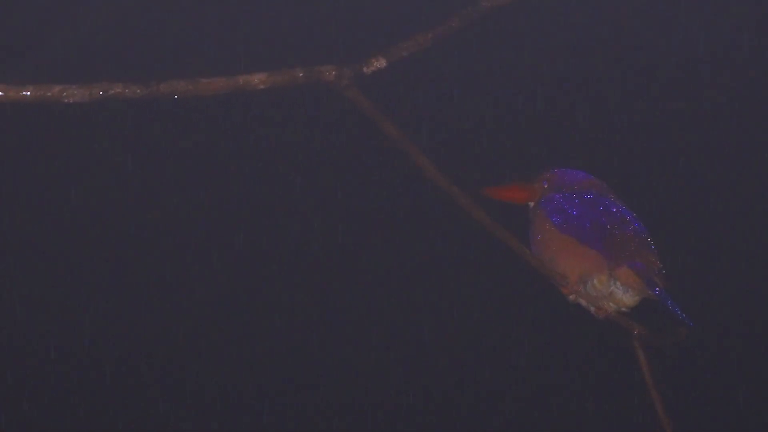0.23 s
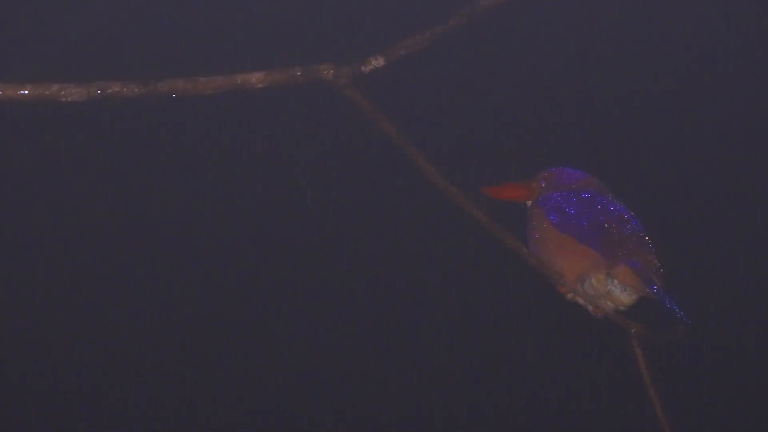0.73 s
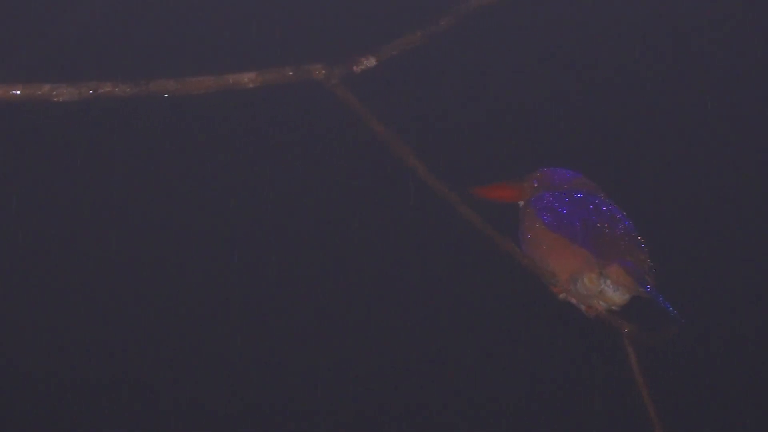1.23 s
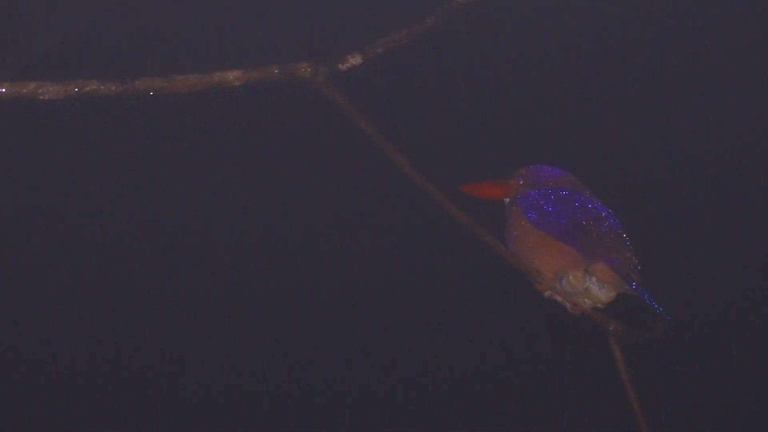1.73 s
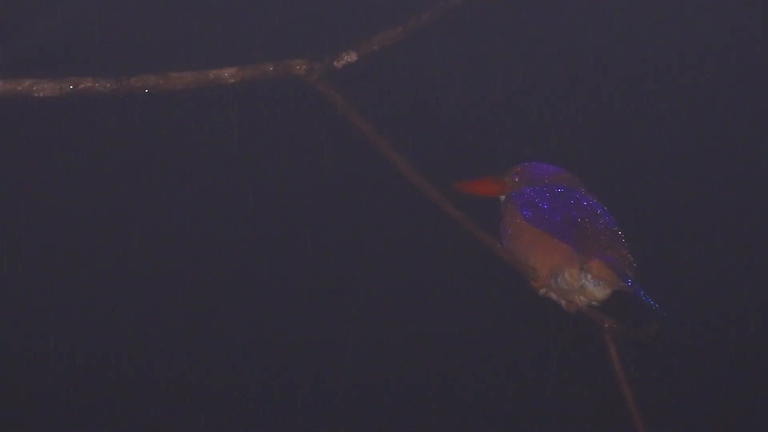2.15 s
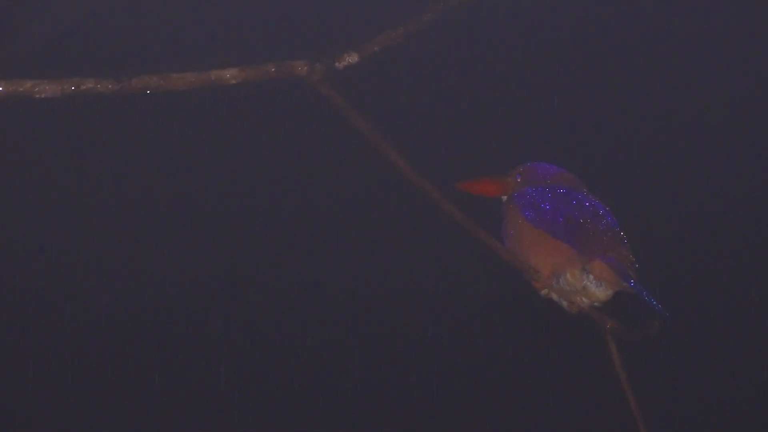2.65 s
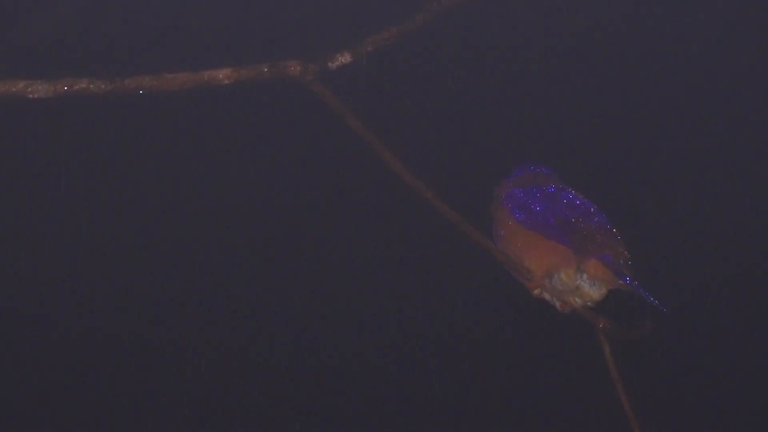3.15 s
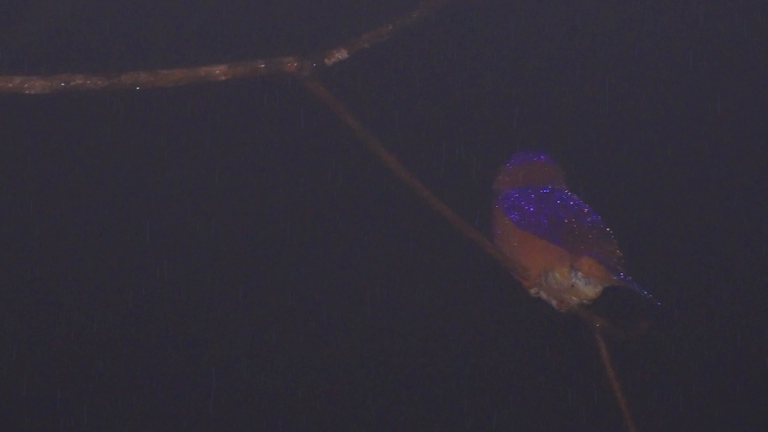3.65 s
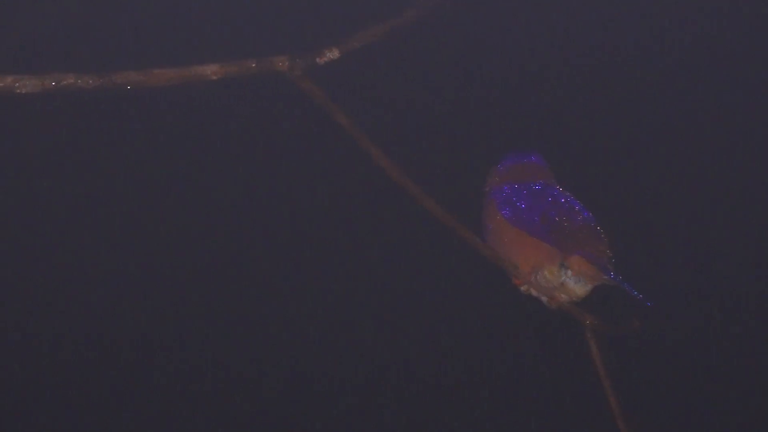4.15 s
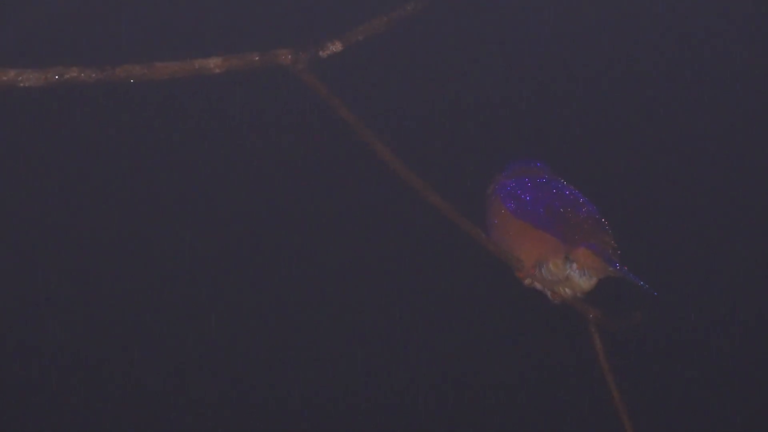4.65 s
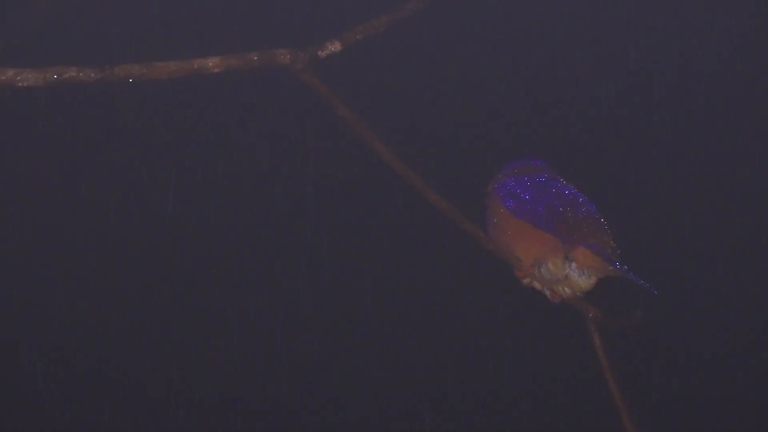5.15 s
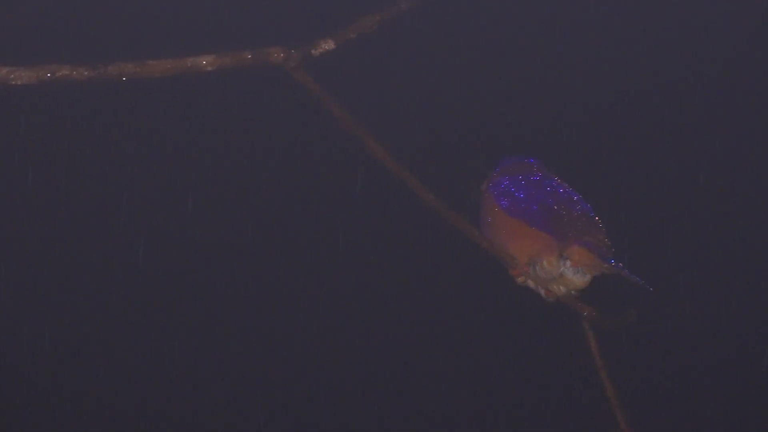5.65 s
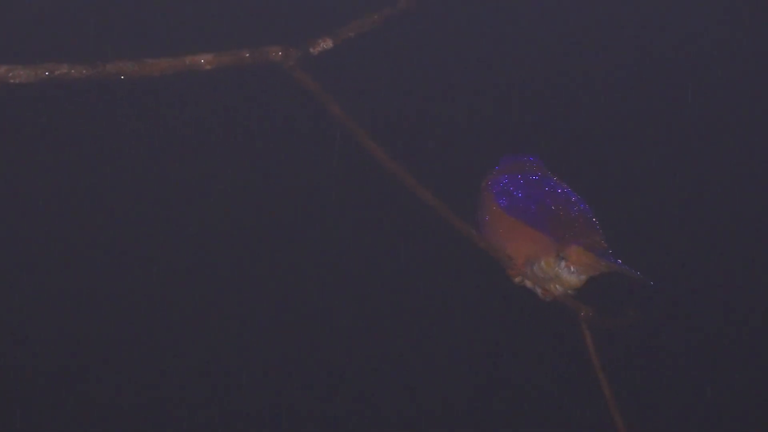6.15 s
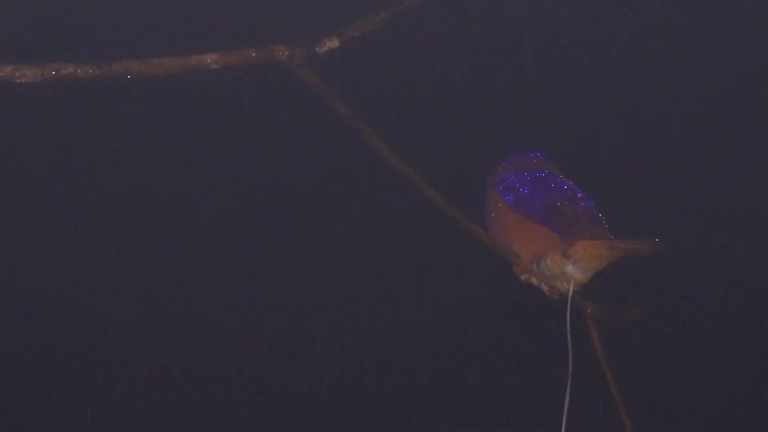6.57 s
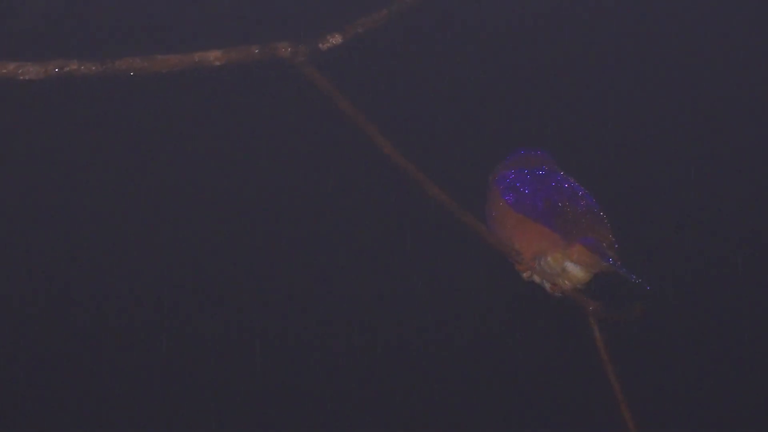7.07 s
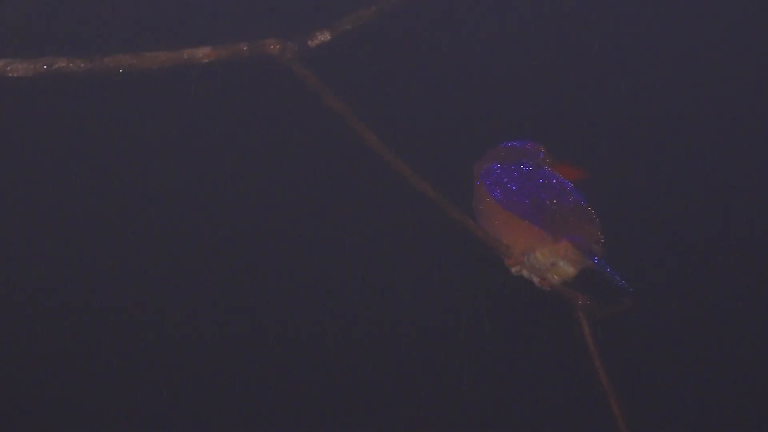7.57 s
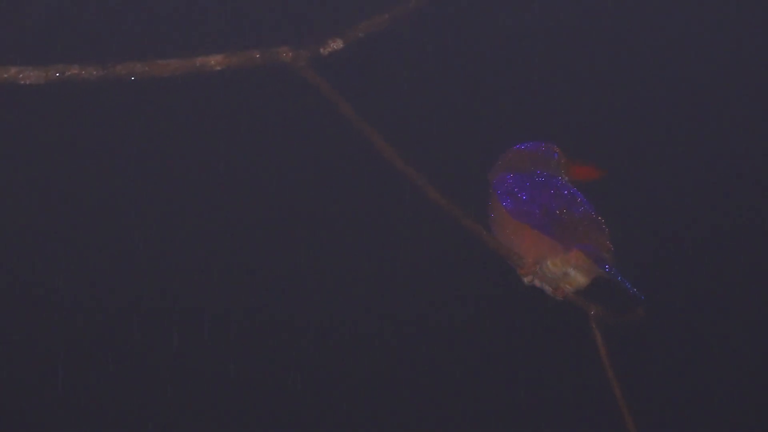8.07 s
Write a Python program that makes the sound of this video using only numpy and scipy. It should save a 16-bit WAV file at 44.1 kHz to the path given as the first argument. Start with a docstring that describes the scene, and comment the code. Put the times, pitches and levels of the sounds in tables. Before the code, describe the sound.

Steady rain hisses on a forest canopy at night, over a continuous high drone of crickets. Two katydids close on the right give short, high buzzing chirps, often about three quarters of a second apart, and fainter ones answer from farther off. Thin rasps come from both sides and large drops tap on leaves. Soft cricket peeps run through the first three seconds and return briefly near the end.

```python
"""A wet forest at night. Rain hisses throughout under crickets, a faint frog and the high rasps of small
katydids. From 0.7 s two katydids close on the right share short buzzing wing strokes, mostly three
quarters of a second apart, answered by far ones. Cricket peeps run until 3 s while large drops knock
on leaves; the drops then thin out, and the peeps return briefly at 7.6 s."""
import sys
import numpy as np
from scipy import signal
from scipy.fft import rfft, irfft, next_fast_len
from scipy.io import wavfile
from scipy.ndimage import uniform_filter1d

SR = 44100
rng = np.random.default_rng(int(sys.argv[2]) if len(sys.argv) > 2 else 0)


def transcribe(u):
    """Save the signal u as a 16-bit wav file named by the first command-line argument.

    u: samples, shape (n,) or (channels, n), limited to [-1, 1]; the rate is SR.
    q: integer samples, one column per channel.
    """
    v = np.clip(np.atleast_2d(u).T, -1, 1)
    q = np.round(v * 32767).astype(np.int16)
    wavfile.write(sys.argv[1], SR, q)


N = 366010

# Katydids (pan is always left minus right): pan/dB, tooth rate/Hz, 10.5 kHz lift/dB, [(t/s, level/dB)]
KATYDIDS = [(-9.5, 340.8, 0, [(.74, -31), (1.472, -30), (5.063, -30), (6.581, -30), (7.31, -31),
            (8.258, -30.5)]), (-17, 342.2, -0.5, [(2.246, -30.5), (3.744, -31), (4.408, -30),
            (5.852, -30.5)]), (-16, 339, 0, [(.02, -45.5), (.416, -52), (2.724, -54), (7.765, -57)]),
            (-5, 336.5, -2, [(1.071, -52.5), (1.274, -53.5), (1.953, -53), (2.615, -57), (3.483, -52),
            (4.09, -51), (5.504, -55), (6.237, -56), (6.917, -56)]), (-13, 240, 5, [(3.062, -49),
            (8.084, -49)])]
# Tone colour of the wing: f/Hz, level/dB
WING_SPECTRUM = [(4120, -61), (7000, -20.5), (7420, -31), (7780, -15), (8410, -9), (9260, -6), (9510, -2),
                 (9980, -1.5), (11000, -13.5), (11400, -19), (11900, -17.5), (12900, -24), (14600, -21),
                 (15800, -24)]
# When each band of the wing peaks within a stroke: f/Hz, offset/s
WING_TIMING = [(7800, -0.02), (8500, -0.016), (9500, -0.011), (10300, -0.011), (12000, -0.031),
               (15000, -0.031)]
# Rasps of smaller katydids: t/s, level/dB, pan/dB, half length/s
RASPS = [(0.242, -41, 7, 0.013), (0.636, -47, 6, 0.036), (0.818, -38.5, 14, 0.075),
         (0.932, -43.5, 1.5, 0.035), (1.184, -46, 0.8, 0.068), (1.513, -33, 5, 0.051),
         (2.585, -40.5, -4, 0.026), (2.678, -47, -3.5, 0.059), (3.05, -42, 12, 0.023),
         (3.165, -39, 16, 0.025), (3.23, -42, 6, 0.042), (3.342, -36, -9, 0.035), (3.548, -36, 11, 0.03),
         (4.011, -39, -10, 0.043), (4.94, -35, 11, 0.025), (5.132, -39, 0, 0.073), (5.543, -37, 10, 0.023),
         (5.692, -44, 3.1, 0.073), (5.843, -42, 0, 0.041), (6.171, -36.5, -3.7, 0.038),
         (6.358, -45, -11, 0.032), (7.216, -40, 9, 0.026), (7.908, -38, -7, 0.037)]
# Wing modes of a rasp: f/Hz, width/Hz, level/dB
RASP_MODES = [(11700, 900, -8), (13000, 1300, 0), (14000, 1400, 2), (14900, 1400, 4), (15700, 1200, 6)]
# Large drops on leaves, the highest sharp spatters: t/s, level/dB, f/Hz, pan/dB, ring/s
DROPS = [(.2418, -28, 10400, 8, .008), (.4815, -31, 1380, 8, .03), (.4817, -39, 2500, 6, .008),
         (1.0435, -29, 10400, -10, .008), (1.539, -35.5, 2450, -3, .012), (2.5575, -32.5, 10400, -8, .008),
         (2.6045, -39, 3100, 5, .006), (2.6835, -39, 850, 0, .014), (2.5172, -41, 1500, 2, .012),
         (2.587, -42, 1450, 0, .012), (2.6045, -49, 520, 0, .008), (.3082, -42, 1730, 2, .01),
         (1.2441, -41, 1360, 0, .01), (1.3448, -42, 1720, 4, .01), (1.4701, -42, 1090, 2, .01),
         (6.0856, -42, 2000, -5, .01), (7.2584, -41, 2000, -2, .008), (8.0336, -43, 1050, 3, .01),
         (2.7261, -31, 1950, -10, .006), (2.7262, -30.5, 10400, -8, .008), (3.4425, -33, 3100, 3, .006),
         (3.4512, -35, 1250, -10, .01), (3.4665, -32, 10400, -9, .008), (3.9255, -32, 10400, -2, .008),
         (4.6983, -34.5, 5000, -2, .006), (4.8775, -36, 3400, 0, .008), (5.078, -31, 10400, 0, .006),
         (6.165, -57, 330, 0, .015), (5.122, -52.5, 330, -1, .02), (5.362, -58, 280, 1, .02),
         (6.82, -58, 280, 0, .015), (7.31, -60, 300, 0, .015), (6.9122, -41, 1150, -9, .012),
         (7.2718, -32, 1900, 4, .01), (7.8237, -35, 5000, -2, .006)]
# Bouts of cricket peeps: first t/s, last t/s, level/dB
PEEP_BOUTS = [(.737, 2.953, -47.3), (7.57, 8.028, -47.8)]
# Single short cricket notes: t/s, f/Hz, level/dB
LONE_NOTES = [(.36, 5930, -51), (1.752, 6250, -53), (2.558, 5820, -50)]
# Cricket trills, long then short: t/s, level/dB, length/s
TRILLS = [(.2, -51, 0.3), (.5, -53.5, 0.18), (1.385, -53, 0.29), (1.681, -53.5, 0.19), (2.453, -53, .24),
          (2.71, -55, 0.2), (3.44, -54, .28), (3.756, -61, 0.18), (4.569, -52, 0.27), (4.86, -57, 0.17),
          (5.68, -54, 0.32), (5.98, -56, 0.18), (7.039, -53.5, 0.24), (7.317, -52.5, 0.17),
          (8.171, -51, 0.27)]
# Tone colour of the rain wash: f/Hz, level/dB
RAIN_SPECTRUM = [(20, -50), (45, -53), (120, -11.5), (300, -13.5), (430, -13), (680, -0.5), (1070, 0),
                 (1720, 1), (2600, 0), (3800, -6), (5200, 2), (7000, 2.5), (8000, -2), (11500, -3.5),
                 (16000, -6.5)]
# Narrow dips in the wash: f/Hz, half width/Hz, level/dB
RAIN_DIPS = [(828, 25, -6), (1004, 21, -2.5), (1260, 35, -2.5), (1543, 45, -3.5), (2700, 92, -0.5)]
# How alike the wash is left and right: f/Hz, correlation
RAIN_LIKENESS = [(60, 0.6), (130, 0.99), (290, 0.12), (640, 0.73), (1410, 0.068), (3100, 0.56), (6800, 0.5),
                 (15000, 0.32)]
# Where the wash leans: f/Hz, pan/dB
RAIN_PAN = [(60, -2), (150, -2.5), (380, -4.5), (950, 4.5), (2380, -1.5), (5980, -0.5), (15000, -1)]
# Low hum under the rain: f/Hz, level/dB
HUM_TONES = [(48.4, -95), (70.0, -87.5), (118.4, -86)]
# Faint held tones in the wash: f/Hz, width/Hz, level/dB
MURMUR_TONES = [(328.5, 26, -84.5), (686, 20, -72.5), (757, 23, -72.5), (1060, 26, -71.5),
                (1182, 23, -74.5), (1932, 28, -71.5)]
# Echoes off trunks: t/s, level/dB
TRUNK_ECHOES = [(0.011, -9), (.045, -8.5), (.085, -12.5), (.13, -25)]
# Decay of the tail from the leaves: f/Hz, t60/s
FOREST_DECAY = [(300, 0.39), (2000, 0.12), (9000, 0.59), (15000, 0.22)]
# Phase lag of the microphone's right port: f/Hz, lag/rad
RIGHT_LAG = [(700, 0.61), (1700, 0.27), (2400, 3.54), (4500, 2.8), (7200, 2.83), (9000, 1.75),
             (12000, 3.98)]

NEAR_DB = -38  # strokes louder than this sit close by


def stroke(tooth_hz, lift_db, roughness):
    """One wing stroke: evenly struck teeth give a comb of partials. It creeps, bites and stops short."""
    t = np.arange(-.1, .1, 1 / SR)
    harmonic = np.arange(20, 47)[:, None]
    hz = harmonic * tooth_hz
    glide = -.085 * np.pi * (harmonic - 28) ** 2  # each tooth's ring slides in pitch
    jitter = 2 * np.pi * hz * 10e-6 * drift(60, len(t))  # the teeth fall a little unevenly
    scatter = .35 * rng.standard_normal(hz.shape)
    wander = roughness * (hz / 9500) ** 2 * np.array([drift(60, len(t)) for _ in hz])
    flutter_db = 2.4 * np.array([drift(25, len(t)) for _ in hz])
    creep_db = -7 * np.clip((hz - 8600) / 900, 0, 1) * (1 - np.tanh((t + .024) / .002)) / 2
    fall_s = np.clip(.013 + .011 * (hz - 8200) / 1000, .01, .04)
    swell = hump(t - curve(WING_TIMING, hz), .024, fall_s)
    stop = (1 - np.tanh((t - .015) / .002)) / 2
    colour_db = curve(WING_SPECTRUM, hz) + lift_db * hump(hz - 10500, 610, 550)
    partials = np.cos(2 * np.pi * hz * t + glide + jitter + scatter + wander)
    buzz = (gain(colour_db + flutter_db + creep_db) * swell * stop * partials).sum(0)
    return buzz / rms(buzz[abs(t) < .015])


def katydids(near, roughness):
    """The near or the far singers; the tooth rate wavers from stroke to stroke."""
    out = np.zeros((2, N))
    for pan_db, tooth_hz, lift_db, strokes in KATYDIDS:
        for s, db in strokes:
            if (db > NEAR_DB) == near:
                buzz = stroke(tooth_hz + .5 * rng.standard_normal(), lift_db, roughness)
                place(out, s - .1, gain(db) * buzz, pan_db)
    return out


def rasps(faint_per_s=1.2, clicks_per_s=4000):
    """Fast uneven tooth clicks ring a few high modes, whose level and timing differ in every rasp."""
    out, t = np.zeros((2, N)), np.arange(-.15, .15, 1 / SR)
    # Each near stroke ends in a high hiss.
    hisses = [(s + .082, db - 20, 4, .067)
              for *_, strokes in KATYDIDS for s, db in strokes if db > NEAR_DB]
    faint = [(when * N / SR, -60 + 6 * level, 18 * (side - .5), .025 + .03 * length)
             for when, level, side, length in rng.random((round(faint_per_s * N / SR), 4))]
    for s, db, pan_db, half_s in RASPS + hisses + faint:
        clicks = rng.standard_normal(len(t)) * (rng.random(len(t)) < clicks_per_s / SR)
        rasp = np.zeros(len(t))
        for hz, width, mode_db in RASP_MODES:
            spread, slip = rng.standard_normal(2)
            swell = hump(t - .3 * half_s * slip, .75 * half_s, .5 * half_s)
            rasp += gain(mode_db + 3.5 * spread) * resonate_twice(clicks, hz, width) * swell
        place(out, s - .15, .65 * gain(db) * rasp / rms(rasp[abs(t) < half_s]), pan_db)
    return out


def leaf_hit(hz, ring_s):
    """A drop pops, the leaf rattles above and below that pitch, and a long ring brings a low knock."""
    t = np.arange(0, .15, 1 / SR)
    cycles = t * hz
    pop = np.sin(2 * np.pi * cycles) * cycles * np.exp(-1.3 * cycles)
    burst = rng.standard_normal(len(t)) * gain(-30 * t / ring_s) * np.minimum(cycles, 1)
    rattle = .8 * resonate_twice(burst, 1.26 * hz, .22 * hz) + resonate_twice(burst, .88 * hz, .18 * hz)
    rattle *= np.clip(22 * ring_s, .12, 1) / abs(rattle).max()
    knock = np.sin(2 * np.pi * .41 * cycles) * gain(-60 * t / (2.9 * ring_s)) * np.minimum(t / .004, 1)
    return pop / abs(pop).max() + rattle + .5 * (ring_s / .032) ** 3 * knock


def drops(patter_per_s=250, patter_db=-55.5):
    """Large drops and spatters hit leaves over a patter of small ones to either side."""
    out = np.zeros((2, N))
    for s, db, hz, pan_db, ring_s in DROPS:
        place(out, s, gain(db) * leaf_hit(hz, ring_s), pan_db)
    leaves = [leaf_hit(hz, .01)[:2000] for hz in np.geomspace(1000, 5000, 16)]
    for when, which, size in rng.random((round(patter_per_s * N / SR), 3)):
        leaf = int(which * len(leaves))
        db = patter_db + 3.12 * min(-np.log(size), 3)
        place(out, when * N / SR, gain(db) * leaves[leaf], pan_db=8 * (-1) ** leaf)
    return out


def whistle(hz, db, envelope):
    """One cricket note, unsteady in pitch and level."""
    tone = sine(hz + 60 * drift(150, len(envelope)))
    return gain(db + 3.5 * drift(100, len(envelope))) * tone * envelope


def peeps(gap_s=.445):
    """Evenly paced peeps sag ever faster through 5.8 kHz, each trailed by a blip; a few blips are lone."""
    out, t = np.zeros((2, N)), np.arange(-.04, .04, 1 / SR)
    peep, blip = np.exp(-(t / .016) ** 4), hump(t, .0079, .0064)
    sag_hz = 5886 - 327 * np.maximum(t / .016 + 1, 0) ** 2 / 4
    for first, last, db in PEEP_BOUTS:
        for s in np.linspace(first, last, round((last - first) / gap_s) + 1):
            place(out, s - .04, whistle(sag_hz, db, peep))
            place(out, s - .04 + .027, whistle(5970, db - 7, blip))
    for s, hz, db in LONE_NOTES:
        place(out, s - .04, whistle(hz, db, blip))
    return out


def trill(length_s):
    """Puffs of tooth noise ring a distant cricket's wing near 4.5 kHz."""
    t = np.arange(-length_s, length_s, 1 / SR)
    puffs = 1 + .78 * np.cos(phase(75 + 15 * drift(14.2, len(t))))
    ring = resonate_twice(puffs * rng.standard_normal(len(t)), 4460, 420)
    return unit_rms(ring) * hump(t, .45 * length_s, .22 * length_s)


def crickets():
    """Trills over a distant, unbroken crowd of the same kind."""
    out = np.zeros((2, N))
    for s, db, length_s in TRILLS:
        place(out, s - length_s, gain(db) * trill(length_s), pan_db=2)
    crowd = np.array([resonate(noise, 4440, 210) for noise in rng.standard_normal((2, N))])
    return out + gain(-67.5 + 2.5 * drift(4.1)) * unit_rms(crowd)


def cricket_buzz():
    """One steady, fast-pulsed cricket near 7.2 kHz, centred in a wide crowd."""
    pulses = 1 + .6 * np.cos(phase(135.5 + 1.5 * drift(3)))
    singer = pulses * sine(7185 + 12 * drift(7.9))
    centre, *sides = [resonate_twice(noise, 7140, 440) for noise in rng.standard_normal((3, N))]
    solo = gain(-56 + 1.5 * drift(2.5)) * unit_rms(singer)
    return solo + gain(-53 + 1.5 * drift(6.7)) * unit_rms(.45 * centre + np.array(sides))


def frog(throb_hz=5.972):
    """A faint 1.7 kHz call that throbs without a break."""
    t = np.arange(N) / SR
    throb = np.exp(1.6 * np.cos(2 * np.pi * throb_hz * (t - .013)))
    call = throb * sine(1720 + 10 * drift(9.5))
    return pan(gain(-68 + .99 * drift(5.2)) * unit_rms(call), 3)


def rain(level_db=-45):
    """Far rain on the canopy: a wash of shaped noise with drifting louder and softer patches."""
    frames, hz = N // 256 + 5, np.fft.rfftfreq(1024, 1 / SR)
    left_re, left_im, side_re, side_im, patches = rng.standard_normal((frames, 513, 5)).T
    patches = unit_rms(uniform_filter1d(uniform_filter1d(patches, 14, axis=0), 10, axis=1))
    likeness = curve(RAIN_LIKENESS, hz)[:, None]
    left = left_re + 1j * left_im
    right = likeness * left + np.sqrt(1 - likeness ** 2) * (side_re + 1j * side_im)
    lean_db = np.array([.5, -.5])[:, None, None] * curve(RAIN_PAN, hz)[:, None]
    dips_db = sum(db * hump(hz - f, half, half) for f, half, db in RAIN_DIPS)
    colour_db = (curve(RAIN_SPECTRUM, hz) + dips_db)[:, None]
    spectra = np.array([left, right]) * gain(colour_db + lean_db + 1.6 * patches)
    return gain(level_db) * unit_rms(signal.istft(spectra, nperseg=1024, noverlap=768)[1][:, :N])


def murmur():
    """Faint fuzzy tones that swell and sink within the rain."""
    noise = rng.standard_normal(N)
    tones = sum(gain(db + 2.4 * drift(1.3)) * unit_rms(resonate(noise, hz, width))
                for hz, width, db in MURMUR_TONES)
    return pan(tones, 3)


def hum():
    """Low tones wavering beneath the rain."""
    return sum(gain(db + 6.5 + 1.3 * drift(6)) * sine(hz + .85 * drift(2.5)) for hz, db in HUM_TONES)


def forest(x, echo_db, tail_db, lean_db):
    """Adds single echoes off trunks and a diffuse tail from the leaves."""
    size = SR * 6 // 10
    taps = rng.standard_normal((2, size)) * (rng.random((2, size)) < 2000 / SR)
    taps[1] = .3 * taps[0] + .95 * taps[1]  # both sides share some of the tail
    hz, t, spectra = signal.stft(taps, SR, nperseg=256)
    envelope = gain(-60 * t / curve(FOREST_DECAY, hz)[:, None]) * np.minimum(t / .019, 1)
    tail = signal.istft(spectra * envelope, SR, nperseg=256)[1]
    tail *= gain(tail_db) / np.linalg.norm(tail[0])
    for s, db in TRUNK_ECHOES:
        tail[[0, 1], round(s * SR) + rng.integers(0, 2, 2)] += gain(db + echo_db)
    tail *= gain([[lean_db / 2], [-lean_db / 2]])  # echoes and tail lean by a set amount, here right
    return x + signal.fftconvolve(np.sqrt(.5) * x.sum(0)[None], tail, axes=1)[:, :N]


def right_port_lag(x):
    """Sound from all around reaches the microphone's right port with its phase turned."""
    size = next_fast_len(N)
    lag = curve(RIGHT_LAG, np.fft.rfftfreq(size, 1 / SR))
    right = irfft(rfft(x[1], size) * np.exp(-1j * lag), size)[:N]
    return np.array([x[0], right])


def gain(db):
    return 10 ** (np.asarray(db) / 20)


def rms(x):
    return np.sqrt(np.mean(x ** 2) + 1e-20)


def unit_rms(x):
    return x / rms(x)


def phase(hz):
    return 2 * np.pi * np.cumsum(hz) / SR


def sine(hz):
    return np.sin(phase(hz))


def curve(points, hz):
    """Reads a table along a log frequency axis."""
    f, value = np.transpose(points)
    return np.interp(np.log(hz + 1), np.log(f + 1), value)


def pan(sound, pan_db):
    """Mono to stereo, the mean power kept."""
    right = 1 / (1 + gain(2 * pan_db))
    return np.sqrt(2 * np.array([[1 - right], [right]])) * sound


def place(mix, s, sound, pan_db=0):
    """Lays a panned sound into the mix from time s."""
    at = round(s * SR)
    start = max(at, 0)
    sound = sound[max(-at, 0):][:N - start]
    mix[:, start:start + len(sound)] += pan(sound, pan_db)


def resonate(x, hz, width):
    """One ringing mode."""
    pole = np.exp((2j * np.pi * hz - np.pi * width) / SR)
    return 2 * signal.lfilter([1 - abs(pole)], [1, -pole], x).real


def resonate_twice(x, hz, width):
    """A mode with steeper skirts."""
    return resonate(resonate(x, hz, width), hz, width)


def drift(rate_hz, size=N):
    """Smooth random modulation of rms 1."""
    knots = rng.standard_normal(int(size / SR * 400) + 4)
    knots = signal.lfilter([1], [1, -np.exp(-2 * np.pi * rate_hz / 400)], knots)
    return unit_rms(np.interp(np.arange(size) / SR * 400, np.arange(len(knots)), knots))


def hump(t, rise, fall):
    """A swell that peaks at t = 0."""
    return np.exp(-.5 * (t / np.where(t < 0, rise, fall)) ** 2)


def scene():
    """Four layers, each with its own share of forest reverb, over a steady bed."""
    near = gain(.8) * katydids(near=True, roughness=.3)
    near = forest(near, echo_db=-3.5, tail_db=-8, lean_db=-6)
    far = gain(1.5) * katydids(near=False, roughness=.75) + crickets()
    far = forest(far, echo_db=-2, tail_db=-3.5, lean_db=-3.5)
    high = forest(gain(.5) * rasps(), echo_db=-6, tail_db=-4, lean_db=-2.5)
    close = forest(peeps() + drops(), echo_db=-14, tail_db=-13, lean_db=0)
    bed = cricket_buzz() + frog() + murmur() + rain() + hum()
    return right_port_lag(near + far + high + bed) + close


def record(dry):
    """A steep high cut at 15.7 kHz."""
    high_cut = signal.firwin(1023, 15730, window=("kaiser", 9), fs=SR)
    return signal.oaconvolve(dry, high_cut[None], "same")


dry = scene()
out = record(dry)
transcribe(out)
```